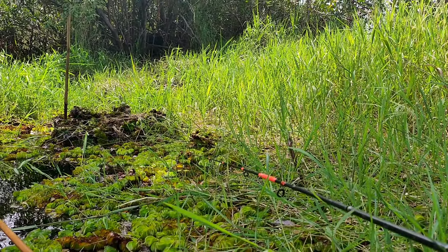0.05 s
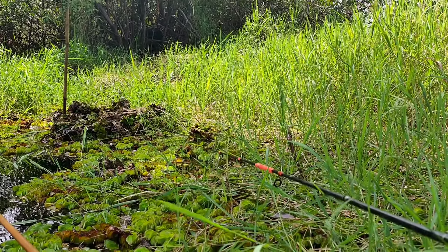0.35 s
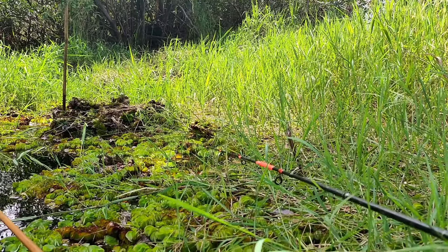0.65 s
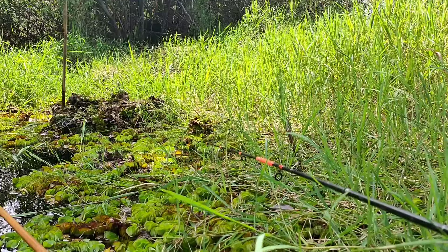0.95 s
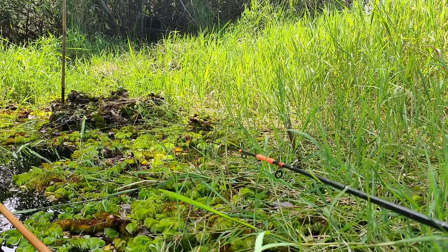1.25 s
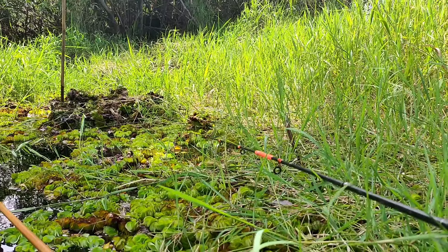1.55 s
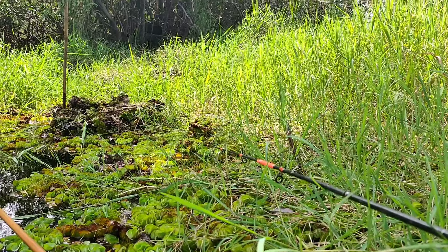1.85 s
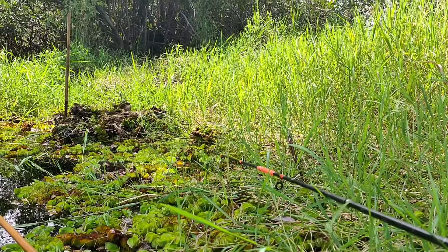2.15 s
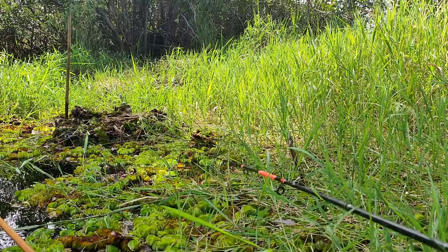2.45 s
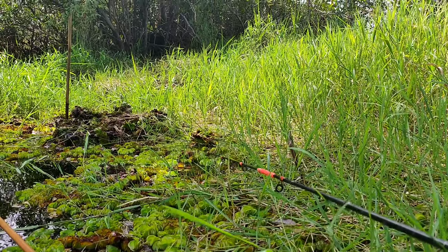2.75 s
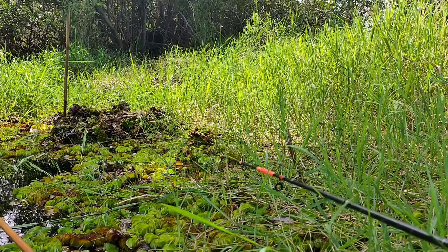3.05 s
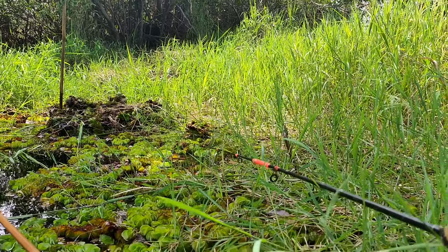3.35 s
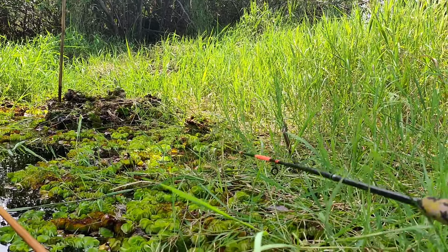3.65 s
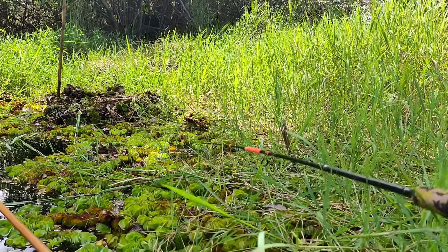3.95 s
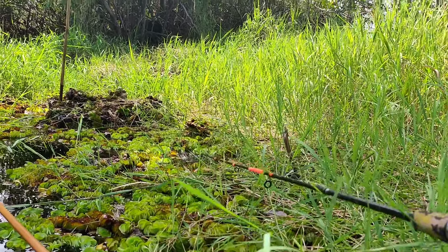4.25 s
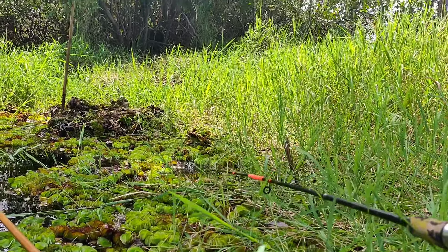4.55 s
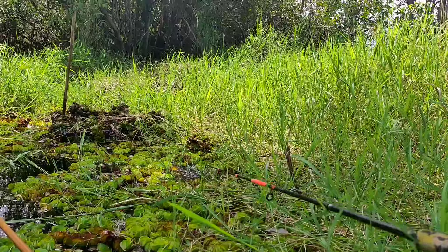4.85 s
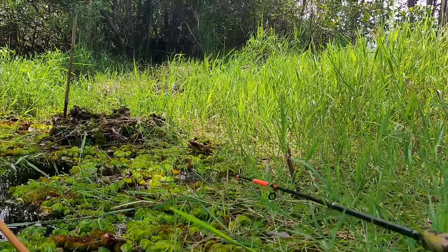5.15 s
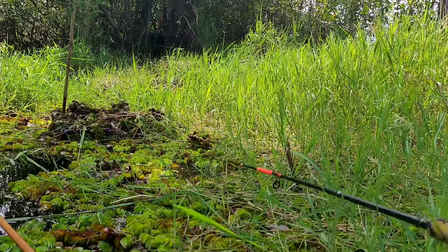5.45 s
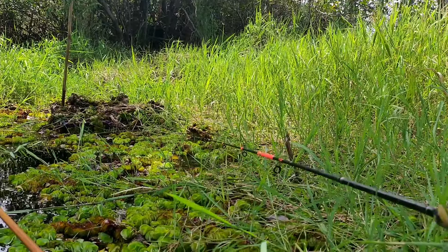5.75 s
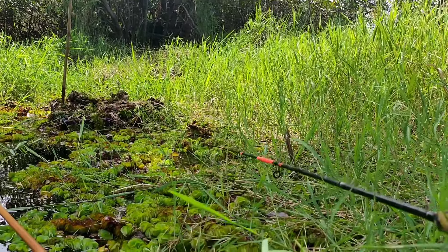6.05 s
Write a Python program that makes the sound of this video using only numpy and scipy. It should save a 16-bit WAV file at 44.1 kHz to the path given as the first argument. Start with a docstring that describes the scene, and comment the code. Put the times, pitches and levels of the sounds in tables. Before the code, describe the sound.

A bird repeats a short rising chirp over faint insects, while growing wind rumbles on the microphone and tall grass rustles and snaps.

```python
"""A bird whistles a rising chirp over and over beside a swampy pond, and the trees echo each one.
Insect wings whine high up on the right, and a cricket chirps on the left. A breeze gets up,
thumps the microphone, murmurs in far trees and stirs tall grass, whose blades rub and snap.
Twice the water plops: a dull slap, then the ring of a trapped bubble."""
import sys
import numpy as np
from scipy import signal
from scipy.fft import rfft, irfft, next_fast_len
from scipy.io import wavfile
from scipy.ndimage import uniform_filter1d

SR = 44100
rng = np.random.default_rng(int(sys.argv[2]) if len(sys.argv) > 2 else 0)


def unload_audio(sound):
    """Save the sound as a 16-bit wav file, at the path given as the first command line argument."""
    columns = np.transpose(np.atleast_2d(sound))
    # keep every value between -1 and 1, then stretch to whole-number steps
    steps = np.round(np.clip(columns, -1, 1) * 32767)
    wavfile.write(sys.argv[1], SR, steps.astype(np.int16))


N = 273420
TIME = np.arange(N) / SR

# "Pan" is how much louder the left side is. A "base level" is turned up or down further in the code.
# the bird's calls: (time [s], starting pitch [Hz], top pitch [Hz], base level [dB], glide boost [dB])
BIRD_CHIRPS = [(-0.125, 1870, 2214, -65, 5), (0.15, 1867, 2204, -49.5, 4.5), (0.425, 1848, 2206, -47.5, -2),
               (0.696, 1915, 2194, -51, 0.5), (0.984, 1873, 2184, -50.5, -1),
               (1.295, 1815, 2188, -46.5, -5), (1.574, 1874, 2196, -52, 2.5),
               (1.885, 1856, 2187, -49.5, -1), (2.17, 1886, 2180, -50, 5), (2.566, 1825, 2192, -48.5, 3.5),
               (2.854, 1940, 2209, -45, 3), (3.131, 2010, 2231, -43, -2), (3.425, 1914, 2217, -44, -0.5),
               (3.715, 1900, 2240, -43.5, 4), (3.999, 1930, 2192, -42, 3), (4.313, 1869, 2237, -42.5, 2.5),
               (4.575, 1932, 2193, -41.5, 3.5), (4.855, 1900, 2178, -44, 4), (5.134, 1900, 2174, -40.5, 2),
               (5.437, 1845, 2206, -44.5, 2.5), (5.733, 1870, 2184, -45.5, 2)]
# how one chirp climbs: (time within the chirp [s], share of the way to the top pitch [0-1])
CHIRP_CLIMB = [(-.008, 0), (.004, .22), (.015, 0), (.02, .1), (.029, .56), (.044, .87), (.064, .96),
               (.1, .83)]
# wind on the microphone: (time [s], left level [dB], right level [dB])
WIND_LEVELS = [(0, -55, -66), (0.28, -49, -49), (0.65, -58.5, -58), (0.9, -72, -57.5), (1.3, -65.5, -53.5),
               (1.55, -49.5, -61), (2.15, -44.5, -49), (2.6, -44, -42.5), (3.3, -41, -49.5),
               (3.5, -38.5, -46), (3.9, -41.5, -30), (4.2, -30, -42), (4.4, -46, -37.5), (4.9, -30, -38),
               (5.17, -42.5, -36), (5.35, -28, -33), (5.8, -29, -42.5), (6.2, -36.5, -53)]
# the tone of the wind's rumble: (frequency [Hz], relative level [dB])
WIND_SPECTRUM = [(12, -26), (20, -7), (54, 6.5), (87, 5.5), (149, -1.5), (230, -20), (400, -40.5),
                 (520, -33), (880, -120)]
# single swirls of air that hit the microphone: (time [s], base level [dB], pitch [Hz], pan [dB])
WIND_THUMPS = [(0.063, -35.5, 65, 35), (1.145, -44.5, 70, -31), (1.744, -36.5, 76, 37),
               (3.653, -27.5, 105, -23), (3.705, -24.5, 77.5, -22), (3.721, -20.5, 74.4, -42),
               (3.858, -20.5, 92, -41), (4.765, -30, 95, 20), (5.064, -27.5, 87, -15), (5.405, -25, 79, 19),
               (5.944, -24, 96, 34)]
# grass blades rubbing: (time [s], peak level [dB], pan [dB], pitch [Hz], rough length [s])
GRASS_RUBS = [(3.405, -44, 10, 6740, 0.085), (3.595, -46, 4, 13100, 0.052), (3.651, -42, 1, 13400, 0.029),
              (3.78, -45, 3, 7200, .008), (3.847, -36, 11, 6800, 0.019), (3.96, -45, 6, 7000, 0.056),
              (3.986, -43, -6, 2900, 0.044), (4.031, -36.5, 4, 2070, 0.029), (4.131, -46, -1, 14500, .014),
              (4.172, -27.5, 2, 7340, 0.016), (4.354, -28.5, 5, 7700, 0.01), (4.417, -41, 5, 7200, 0.015),
              (4.552, -32.5, -2, 7500, 0.021), (4.68, -50, -3, 7900, .03), (4.716, -40, 1, 13600, 0.016),
              (4.793, -29.5, 8, 7330, 0.0087), (5.003, -37, 1, 7640, 0.03), (5.143, -43, -1, 6900, 0.022),
              (5.312, -45.5, 6, 6940, 0.029)]
# blades and twigs snapping: (time [s], level [dB], pan [dB], pitch [Hz],
# stalk knock against the click [dB], echo against the snap [dB], treble limit [Hz])
GRASS_SNAPS = [(0.351, -37, -1, 7270, -14.5, -3, 9600), (3.7082, -38, 7, 6600, -10, -4.5, 11000),
               (3.9777, -44, -5, 8100, -11, -6, 15000), (3.9972, -47, 8, 5500, 3, -10, 9000),
               (4.002, -44, 13, 6000, 1, -5, 9000), (4.018, -47, -4, 2800, 3, -9, 8000),
               (4.03, -40.5, 5, 6900, 2, -12, 12000), (4.035, -38.5, -2, 1960, -4, -10, 6000),
               (4.0385, -61, 7, 6850, 13, -9, 9000), (4.182, -44, 14, 7200, -14, -16, 12100),
               (4.3543, -38, 4, 7350, -12, -15, 15000), (4.359, -36, 3, 7600, -3, -2.5, 15000),
               (4.5614, -35, 7, 7500, -6, -7, 15000), (4.585, -43, 6, 7200, -9, -12, 10000),
               (4.6055, -47, 0, 7700, -8, -16, 10000), (4.794, -36, -2, 7750, -28, -8, 12000),
               (4.803, -41, 2, 8000, -10, 0.5, 11000), (5.0134, -44, 1, 7900, 0, 1, 13000),
               (5.161, -40.5, 8, 7100, -18, -2.5, 12000)]
# plops: (time [s], bubble pitch [Hz], bubble level [dB], time to fade by 60 dB [s], splash level [dB])
WATER_PLOPS = [(2.617, 760, -40, 0.043, -34.5), (4.603, 1220, -35.5, 0.057, -46)]
# base levels of the insects: (time [s], crickets [dB], lower chorus [dB], upper chorus [dB])
INSECT_LEVELS = [(0, -66.5, -57, -54), (1.7, -65, -67, -50.5), (3.1, -67, -57.5, -58.5),
                 (4.5, -64, -60.5, -60.5), (5.7, -65, -61, -70), (6.2, -65.5, -62.5, -58)]
# the bands of whine in each insect chorus: (pitch [Hz], width [Hz], relative level [dB], pan [dB])
LOWER_WHINE = [(8570, 460, 3.5, -8), (9070, 430, 8.5, -9)]
UPPER_WHINE = [(9450, 250, -7, -23), (10040, 240, -16, -11)]
# swelling buzzes of a katydid, a bush cricket: (peak time [s], half length [s], level [dB])
KATYDID_BUZZES = [(0.46, 0.09, -68), (2.047, 0.19, -61), (4.995, 0.19, -60)]
# how strongly the near grass stirs: (time [s], base level [dB])
RUSTLE_LEVELS = [(0, -77), (0.33, -80), (0.37, -63), (0.52, -70), (0.62, -86), (3.2, -77), (3.42, -57.5),
                 (3.9, -58), (4.05, -54.5), (4.42, -57.5), (4.5, -58), (4.62, -56.5), (4.75, -58.5),
                 (5.0, -58), (5.3, -64.5), (6.2, -62.5)]
# short gusts rushing through the trees: (peak time [s], half length [s], level [dB])
TREE_GUSTS = [(0.29, 0.041, -64), (1.16, 0.028, -71.5), (1.3, 0.063, -72), (3.98, 0.24, -64),
              (5.41, 0.033, -57), (5.74, 0.017, -56)]
# the tones of rustling grass, murmuring trees and a far hiss: (frequency [Hz], relative level [dB])
RUSTLE_SPECTRUM = [(1600, -4), (2600, -4), (4000, -17.5), (5500, -8.5), (7200, -1.5), (9000, -29),
                   (10300, -12.5), (12500, -13.5), (15800, -26)]
MURMUR_SPECTRUM = [(200, 1), (310, -0.5), (450, -6), (750, -9.5), (1100, -10.5), (1400, -19.5), (1700, -10)]
HISS_SPECTRUM = [(1600, 4), (4000, -8), (5000, -3), (9000, -8.5), (12000, -11), (15800, -36)]
# the background fades and quickly returns: (quietest time [s], fade [s], return [s], depth [dB])
BACKGROUND_DIPS = [(0.052, 0.52, 0.031, 35), (0.88, 0.43, 0.12, 24), (1.108, 0.49, 0.053, 15),
                   (1.618, 0.47, 0.11, 19), (2.074, 0.29, 0.095, 11.5)]


def bird(attack_s=.027, hold_s=.021, release_s=.031, sag_db_per_s=115, bank_delay_s=.085):
    """A nearly pure whistle opens with a small dip, slides up and holds; the far bank and trees echo it."""
    out = np.zeros((2, N))
    when, climb = np.transpose(CHIRP_CLIMB)
    t = np.arange(when[0], when[-1], 1 / SR)
    rise, age = np.interp(t, when, climb), t - t[0]
    ramp = np.clip(np.minimum(age / attack_s, (t[-1] - t) / release_s), 0, 1)
    sag = from_db(-sag_db_per_s * np.maximum(age - attack_s - hold_s, 0))
    envelope = np.sin(np.pi / 2 * ramp) ** 2 * sag
    carried = envelope * from_db(6.5 * rise ** 2)   # the held top note carries best into the trees
    for s, start_hz, top_hz, level_db, glide_db in BIRD_CHIRPS:
        parts_db = np.interp(t, [.017, .022, .027], [4.5, -4, glide_db])   # opening note, tiny break, glide
        waver = np.interp(t, np.linspace(t[0], t[-1], num=36), rng.standard_normal(36))
        hz = (start_hz + (top_hz - start_hz) * rise) * (1 + .004 * waver)
        phase = 2 * np.pi * np.cumsum(hz) / SR
        whistle = np.sqrt(2) * np.sin(phase + [[0], [1.0]])   # the right side hears it a little earlier
        direct = from_db(level_db + parts_db) * envelope * whistle * pan(4.5)
        add(out, s + t[0], direct)
        add(out, s + t[0] + bank_delay_s, from_db(-15) * direct)
        add(out, s + t[0], chirp_echo(carried, phase, level_db + glide_db))
    return out


def chirp_echo(envelope, phase, chirp_db, fade_s=1.45, build_s=.024):
    """The trees answer a chirp. Countless paths fill each other's gaps, so the echo fades smoothly."""
    echo = tree_echoes(envelope * np.sin(phase), fade_s, build_s)
    smooth_power = signal.fftconvolve(envelope ** 2, echo_shape(fade_s, build_s) ** 2)
    power = uniform_filter1d(echo ** 2, size=2200, axis=1)
    echo *= np.sqrt(np.maximum(smooth_power, 0) / (np.abs(power) + 1e-9 * power.max()))
    early_strength = np.sqrt(np.mean(echo[:, SR // 14:SR // 5] ** 2, axis=1, keepdims=True))
    echo_db = -48.5 + .29 * (chirp_db + 42)   # a louder chirp gets an only slightly louder echo
    return from_db(echo_db) * pan(.96) * echo / early_strength


def wind():
    """Swirling air rumbles on each side of the microphone; a strong swirl is a pressure dip and a puff."""
    rumble = shaped_noise(WIND_SPECTRUM, edge_db=21)
    rumble *= from_db(3.6 * np.array([drift(32), drift(32)]))
    rumble /= np.sqrt(uniform_filter1d(rumble ** 2, size=SR // 7, axis=1))   # keep only the quick lumps
    out = from_db(curves(WIND_LEVELS)) * rumble
    t = TIME[:SR // 10] - 1 / 20
    for s, base_db, hz, left_db in WIND_THUMPS:
        envelope = np.exp(-np.hypot(t * hz, .1) / .32)   # a spike with a rounded tip
        puff = from_db(-25.5) * rms_one(band(rng.standard_normal(len(t)), 185, 215))
        thump = envelope * (puff - np.cos(2 * np.pi * hz * t))
        add(out, s + t[0], from_db(base_db + 7.5) * pan(left_db) * thump)
    return out


def grass_rubs():
    """One blade slips past another in a quick run of tiny catches."""
    out, t = np.zeros((2, N)), TIME[:SR // 10]
    for s, peak_db, left_db, hz, length in GRASS_RUBS:
        sizes = from_db(4 * np.minimum(rng.exponential(1, len(t)), 3))
        slip = (t / length) ** 1.5 * np.exp(-4 * t / length)
        catches = slip * sizes * rng.standard_normal((2, len(t)))
        rub = blade(catches, hz) + from_db(-7.5) * stalk(catches)
        add(out, s, from_db(peak_db) * pan(left_db) * rub / np.abs(rub).max())
    return out


def grass_snaps(click_decay_s=.0012, knock_decay_s=.004):
    """A blade springs free with a sharp click and knocks its stalk; the trees echo the snap."""
    out, to_trees, t = np.zeros((2, N)), np.zeros((2, N)), TIME[:SR // 40]
    for s, level_db, left_db, hz, knock_db, echo_db, top_hz in GRASS_SNAPS:
        click, knock = rng.standard_normal((2, 2, len(t))) + .6 * rng.standard_normal((2, 1, len(t)))
        snap = rms_one(blade(click * np.exp(-t / click_decay_s), hz))
        snap += from_db(knock_db) * rms_one(stalk(knock * np.exp(-t / knock_decay_s)))
        snap = signal.sosfilt(signal.butter(4, top_hz, fs=SR, output="sos"), snap)
        snap *= from_db(level_db) * pan(left_db) / np.std(snap[:, :SR // 650])   # level of the first 1.5 ms
        add(out, s, snap)
        add(to_trees, s, from_db(echo_db) * snap)
    return out + tree_echoes(band(to_trees, 6000, 7000), fade_s=.75, build_s=.005)


def blade(touches, hz):
    """A touched grass blade rings briefly and gives a bright crack."""
    return band(touches, hz, 1970) + from_db(-11) * band(touches, 7600, 6800)


def stalk(touches):
    """A knocked stalk answers with a duller tick."""
    return band(touches, hz=2450, width_hz=2000)


def plops(thud_hz=302, thud_fade_s=.027):
    """A slap pushes a hollow into the water with a thud, then the trapped bubble rings."""
    out, t = np.zeros(N), TIME[:SR // 5]
    for s, hz, bubble_db, fade_s, splash_db in WATER_PLOPS:
        slap = (t == 0) + .06 * rng.standard_normal(len(t)) * np.exp(-t / .006)
        splash = band(slap, 290, 720, order=3)
        splash /= np.abs(splash).max()
        bubble = np.sin(2 * np.pi * hz * t) * from_db(-60 * t / fade_s) * (1 - np.exp(-t / .0075))
        thud = np.sin(2 * np.pi * thud_hz * t) * from_db(-5.5 - 60 * t / thud_fade_s)
        add(out, s, from_db(bubble_db) * bubble + from_db(splash_db) * (splash + thud))
    return out * pan(8.8)


def insects(dip_share=.64):
    """Two choruses whine; lower in pitch a near cricket chirps and far ones trill; higher, a katydid."""
    cricket_db, lower_db, upper_db = curves(INSECT_LEVELS) + dip_share * dip_db()
    whine = chorus(LOWER_WHINE, lower_db - 10) + chorus(UPPER_WHINE, upper_db - .5)
    trill = rms_one(band(rng.standard_normal((2, N)), 8010, 240)) * pan(-5)
    buzz = rms_one(band(rng.standard_normal((2, N)), 11200, 1660, order=4))
    katydid = swells(KATYDID_BUZZES) * buzz * pan(-5.5)
    return whine + from_db(cricket_db - 2) * trill + from_db(cricket_db - 4) * cricket() + katydid


def chorus(bands, level_db):
    """Many far wings blend into narrow bands of flickering whine."""
    out = np.zeros((2, N))
    for hz, width, band_db, left_db in bands:
        gain = from_db(level_db + band_db + 2 * drift(12)) * pan(left_db)
        flat_band = [(hz - width / 2, 0), (hz + width / 2, 0)]
        out += gain * shaped_noise(flat_band, edge_db=650, flicker_db=4, bands=4)
    return out


def cricket(pitch_hz=7910, climb_hz=170, chirps_per_s=8.6, strokes_per_s=120):
    """One cricket on the left makes short chirps of quick wing strokes, each chirp climbing a little."""
    cycle = (chirps_per_s * TIME + .12 * drift(2)) % 1
    chirps = .15 + np.sin(np.pi * cycle) ** 3
    stroke_rate = strokes_per_s * (1 + .065 * drift(19))
    strokes = 1 + .49 * np.sin(2 * np.pi * np.cumsum(stroke_rate) / SR)
    hz = pitch_hz + climb_hz * (cycle - .5) + 75 * drift(500)
    tone = np.sin(2 * np.pi * np.cumsum(hz) / SR)
    return rms_one(chirps * strokes * from_db(2.5 * drift(200)) * tone) * pan(14)


def foliage(wind_share=.19, hiss_dip_share=.58):
    """The breeze murmurs in far trees and rustles near grass; the more rustle, the more leaves crackle."""
    wind_db = np.maximum(*curves(WIND_LEVELS))   # the windier side
    murmur_db = -57 + wind_share * (wind_db + 40) + dip_db()
    rustle_db, = curves(RUSTLE_LEVELS)
    far_hiss = shaped_noise(HISS_SPECTRUM, edge_db=2.5, flicker_db=4, bands=10)
    far_hiss *= from_db(-65.5 + hiss_dip_share * dip_db())
    murmur = shaped_noise(MURMUR_SPECTRUM, edge_db=16.5, flicker_db=3.5, bands=8) * pan(1)
    murmur *= from_db(murmur_db) + swells(TREE_GUSTS)
    rustle = shaped_noise(RUSTLE_SPECTRUM, edge_db=-1, flicker_db=1.5, bands=7) * pan(1)
    leaves = from_db(28) * leaf_crackle(touches_per_s=650 * from_db(rustle_db + 60))
    return murmur + far_hiss + from_db(rustle_db - .5) * (rustle + leaves)


def leaf_crackle(touches_per_s):
    """Leaves touch in flurries, mostly lightly; each touch rings at one of twelve pitches."""
    out, pitches = np.zeros((2, N)), np.geomspace(3000, 15000, num=12)
    flurries = from_db(8 * drift(55))
    touching = rng.random(N) < touches_per_s * flurries / SR
    sizes = from_db(4 * np.minimum(rng.exponential(1, N), 2))
    touches = touching * sizes * rng.choice([-1, 1], N)
    pitch_index = rng.integers(len(pitches), size=N)
    for k, hz in enumerate(pitches):
        gain = from_db(np.interp(hz, *np.transpose(RUSTLE_SPECTRUM)))
        out += gain * pan(rng.normal(2, 5)) * band(touches * (pitch_index == k) + 1e-18, hz, 900)
    return out


def tree_echoes(sound, fade_s, build_s):
    """The trees scatter a sound into echoes that thicken and die away."""
    scatter = rng.standard_normal((2, SR)) + 1.12 * rng.standard_normal(SR)   # partly alike on both sides
    scatter *= echo_shape(fade_s, build_s)
    scatter /= np.sqrt(np.sum(scatter ** 2, axis=1, keepdims=True))
    return signal.fftconvolve(np.atleast_2d(sound), scatter, axes=1)[:, :N]


def echo_shape(fade_s, build_s):
    """Echo strength over time: near trunks first, then far ones, which lose 60 dB in fade_s."""
    t = TIME[:SR]
    near, far = from_db(11 - 60 * t / .4), from_db(-60 * t / fade_s)
    return (1 - np.exp(-(t / build_s) ** 2)) * (near + far)


def dip_db():
    """How far the background has sunk at each moment."""
    return np.min([np.interp(TIME, [s - fade, s, s + back], [0, -depth, 0])
                   for s, fade, back, depth in BACKGROUND_DIPS], axis=0)


def shaped_noise(spectrum, edge_db, flicker_db=0, bands=1):
    """Stereo noise with a given tone, losing edge_db an octave past its ends; bands flicker separately."""
    hz, level_db = np.transpose(spectrum)
    size = next_fast_len(N, real=True)
    octave, listed = np.log2(np.arange(size // 2 + 1) * SR / size + 1), np.log2(hz)
    octaves_outside = np.abs(octave - np.clip(octave, listed[0], listed[-1]))
    gain = from_db(np.interp(octave, listed, level_db) - edge_db * octaves_outside)
    noise = rfft(rng.standard_normal((2, size))) * gain
    centres = np.linspace(listed[0], listed[-1], bands)
    out = np.zeros((2, N))
    for share in np.eye(bands):
        one_band = irfft(noise * np.interp(octave, centres, share), size)[:, :N]
        out += one_band * from_db(flicker_db * drift(16))
    return rms_one(out)


def band(sound, hz, width_hz, order=2):
    """Keep the frequencies around hz; a narrow band rings."""
    low = (np.sqrt(width_hz ** 2 + 4 * hz ** 2) - width_hz) / 2
    high = min(low + width_hz, SR / 2 - 1000)
    return signal.sosfilt(signal.butter(order, [low, high], "band", fs=SR, output="sos"), sound)


def swells(rows):
    """A volume curve made of bell-shaped swells."""
    return sum(from_db(db) * np.exp(-((TIME - s) / half) ** 2) for s, half, db in rows)


def drift(per_s):
    """A random wander, roughly 1 in size, that turns per_s times a second."""
    points = rng.standard_normal(4096)
    return np.interp(TIME * per_s, np.arange(len(points)), points)


def curves(rows):
    """Join a table's points in time with straight lines, one curve for each level column."""
    s, *columns = np.transpose(rows)
    return np.array([np.interp(TIME, s, column) for column in columns])


def add(out, s, sound):
    """Mix a sound in at s seconds; it may have begun before time 0."""
    at = int(round(s * SR))
    sound, at = sound[..., max(-at, 0):], max(at, 0)
    out[..., at:at + sound.shape[-1]] += sound[..., :N - at]


def pan(left_db):
    """Left and right volumes that place a sound without changing its power."""
    return rms_one(from_db([[left_db / 2], [-left_db / 2]]))


def rms_one(sound):
    """Scale a sound to an average power of 1."""
    return sound / np.sqrt(np.mean(sound ** 2) + 1e-20)


def from_db(db):
    """Turn decibels into a volume multiplier."""
    return 10 ** (np.asarray(db) / 20)


def scene():
    """Everything round the pond, added together."""
    return bird() + wind() + foliage() + insects() + grass_rubs() + grass_snaps() + plops()


def record(dry, cutoff_hz=16100):
    """The recorder steeply cuts off the highest treble."""
    return signal.sosfilt(signal.ellip(12, .1, 80, cutoff_hz, fs=SR, output="sos"), dry)


dry = scene()
out = record(dry)
unload_audio(out)
```